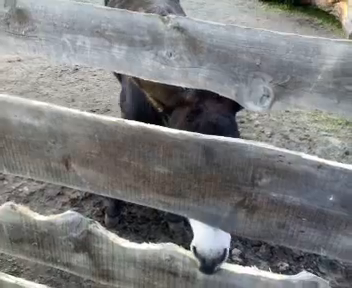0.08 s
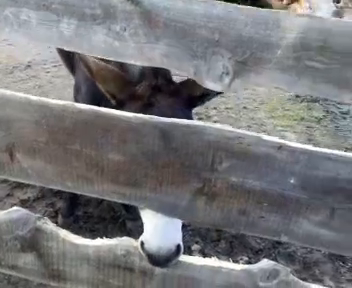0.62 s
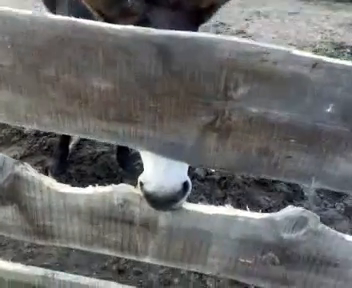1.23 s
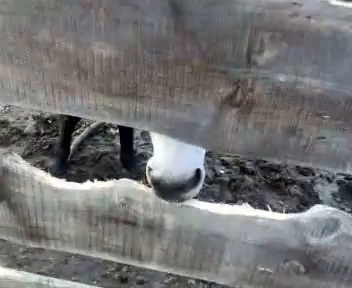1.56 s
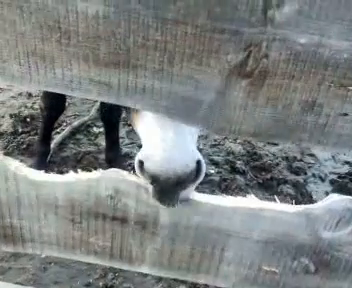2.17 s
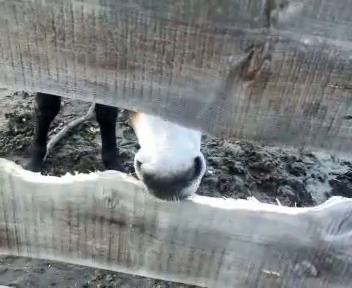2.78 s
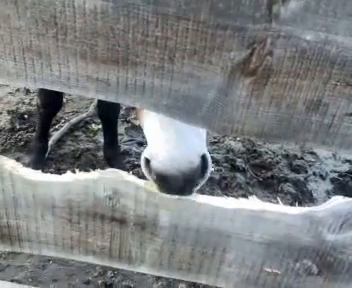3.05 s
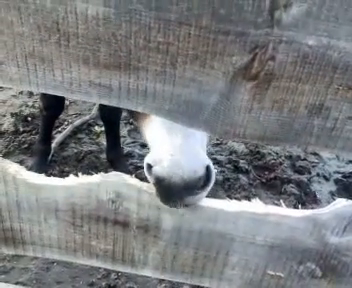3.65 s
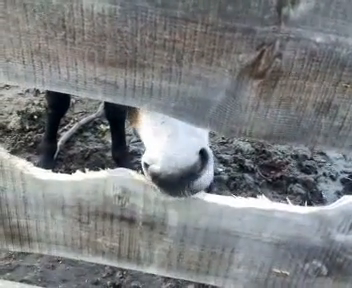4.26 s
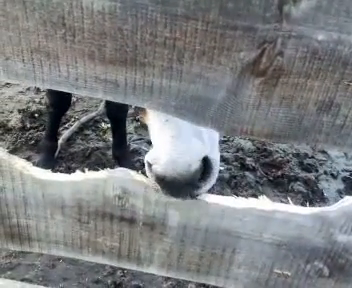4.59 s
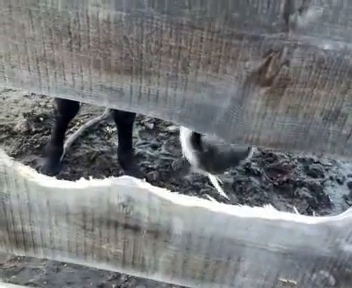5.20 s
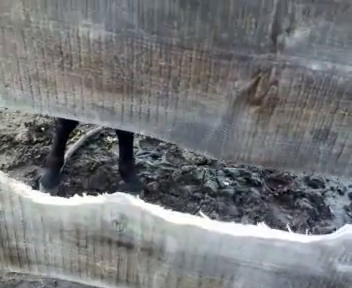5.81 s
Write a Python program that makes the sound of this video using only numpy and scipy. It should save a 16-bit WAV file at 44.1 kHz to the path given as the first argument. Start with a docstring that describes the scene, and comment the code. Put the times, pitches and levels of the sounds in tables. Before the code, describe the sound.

Wood snaps and crunches in short bursts as a donkey bites a fence, with a low hum in the distance.

```python
"""Outdoors at a wooden fence, about a metre away, a donkey gnaws the top edge of a rail.
Friction of muzzle and teeth makes rubs, crackle and stick-slip rasps; splinters snap in clusters
by brittle fracture. When the teeth slip off, the rail springs back and thuds in damped vibration.
A distant motor hums steadily under a faint hiss of open air, and a few thin, far tones come and go."""
import sys
import numpy as np
from scipy import signal
from scipy.fft import rfft, irfft
from scipy.io import wavfile
from scipy.ndimage import uniform_filter1d

SR = 44100
rng = np.random.default_rng(int(sys.argv[2]) if len(sys.argv) > 2 else 0)


def to_wav(sig):
    """Store sig (one row per channel, or 1-D mono) as 16-bit WAV at the path in sys.argv[1].

    Samples outside -1..1 are clipped; the rate is SR.
    """
    pcm = np.clip(np.atleast_2d(sig), -1, 1) * 32767
    pcm = np.round(pcm).astype(np.int16)
    wavfile.write(sys.argv[1], SR, pcm.T)  # frames by channels


N = 257367
TIME = np.arange(N) / SR

# Partials of the motor. Each row: frequency in Hz, rms level in dB.
MOTOR_PARTIALS = [(53.2, -50), (66.5, -52), (132.7, -48), (154.8, -58), (177.0, -73), (199.2, -66.5)]
# Spectra of the air and of the worked wood. Each row: frequency in Hz, relative density in dB.
AIR_SPECTRUM = [(15, -0.5), (45, -4.5), (100, -0.5), (200, -10), (300, -10.5), (500, -16), (1000, -16),
                (1700, -18), (2400, -22.5), (6800, -22), (9000, -27.5), (14000, -58)]
SNAP_SPECTRUM = [(150, -31), (600, -11.5), (1200, -7.5), (2000, -19.5), (2600, 0), (3300, 5.5), (4300, 1),
                 (5600, 1), (7200, 2), (9000, 4.5)]
SCRAPE_SPECTRUM = [(100, -12), (300, -4), (700, -6), (1100, -6), (1700, -6.5), (2400, -3.5), (3500, -1.5),
                   (5500, 0.1), (7000, 0), (9000, -2)]
THUD_SPECTRUM = [(40, -9.5), (90, 12.5), (200, 2.5), (350, 4), (700, 0), (1300, -3.5), (2400, -13),
                 (5000, -20)]
RASP_SPECTRUM = [(100, -11), (300, -4), (700, -10), (1200, -7), (1600, -2), (2400, -9.5), (3500, 4),
                 (5500, -0.5), (7000, 1), (9000, -0.5)]
# A brief, faint, high hiss as the sound opens, then rubs of the muzzle.
# Each row: midpoint in seconds, level in dB, centre in Hz, width in seconds.
NOISE_SWELLS = [(0.102, -56, 5500, 0.02), (0.36, -54.5, 3480, 0.038), (0.536, -55.5, 2400, 0.13),
                (0.995, -45, 380, 0.037), (1.091, -43.5, 5800, 0.061), (1.612, -33.5, 2080, .019),
                (1.818, -53.5, 1430, 0.018), (2.221, -54.5, 2200, 0.026), (2.46, -42.5, 3100, .016),
                (3.011, -52, 2750, 0.022), (3.322, -56, 4300, 0.18), (3.527, -42, 3650, 0.044),
                (3.78, -56, 260, 0.064), (4.099, -58, 1820, 0.15), (4.587, -40, 1500, 0.043),
                (5.7, -52, 1570, 0.0076)]
# Resonances of the chewed edge. Each row: frequency in Hz, bandwidth in Hz, gain in dB.
EDGE_RESONANCES = [(1640, 39, -1.5), (2326, 90, -5), (3020, 37, -11), (3280, 47, -10.5), (4206, 180, 0),
                   (4920, 130, -5.5), (5350, 34, -2), (6130, 60, -3), (6780, 75, 2.5), (7140, 360, -5.5)]
# Bending modes of the rail. Each row: frequency in Hz, level in dB, T60 in seconds.
RAIL_MODES = [(151, -10, 0.14), (197, -18.5, 0.078), (280, -14, 0.03), (320, 2.5, .11), (347.3, -1.5, 0.15),
              (452, -4, 0.3), (540.6, -5, 0.12), (557, 2, 0.089), (632, -1, 0.14), (715, -17.5, 0.04),
              (771, -3, 0.11), (835, -2, 0.073), (876, 4, 0.1), (1005, 8.5, 0.05), (1100, -8.5, 0.032),
              (1255, 5, 0.15)]
# Splinters snapping, plus one sharp crack at 1.037 s that gives the rail's knock at 1.039 s its edge. # Each
# row: time in seconds, level in dB, relative levels of the rail's body # and of the dull crunch in dB, T60 in
# seconds.
SPLINTER_SNAPS = [(0.4889, -34, -16, -9.5, .033), (1.037, -45, 6, 6.5, 0.022),
                  (1.12, -1, -25.5, -12, 0.013), (1.2103, -26, -21, -12, 0.024),
                  (1.3455, -18.5, -9, -11.5, 0.17), (1.3711, -27, -12, -13, .03),
                  (1.436, -26, -16, -12.5, 0.022), (1.4897, -27.5, -32, -13.5, 0.028),
                  (1.6004, -9, -13.5, -17, 0.034), (1.6075, -16.5, -5.5, -18, 0.082),
                  (1.7177, -32, -5, -13, .03), (2.5646, -31.5, -25, -15, .035),
                  (2.6366, -11.5, -13, -15, 0.03), (2.6478, -11, -14.5, -14.5, 0.038),
                  (2.729, -22, -28, -18.5, .043), (2.7828, -16, -19.5, -19.5, 0.03),
                  (2.8504, -24, 1, -29, 0.14), (2.8584, -17.5, -13.5, -11.5, 0.075),
                  (2.939, -23.5, -32, -26, 0.015), (3.9998, -24.5, -14.5, -16, 0.071),
                  (4.2695, -25.5, -30, -19, 0.1), (4.341, -6.5, -22.5, -19.5, 0.043),
                  (4.3587, -14.5, -21, -13, 0.049), (4.4909, -21.5, -23, -15, 0.12),
                  (4.541, -20.5, -9, -14.5, 0.21), (4.5774, -16, -11.5, -18.5, 0.022),
                  (4.796, -19, -19.5, -13, 0.017), (4.9578, -22.5, -12, -20, 0.033),
                  (4.9881, -13.5, -15, -13.5, 0.025), (5.0611, -2.5, -32, -23, 0.026),
                  (5.2057, -13.5, -18, -11, 0.053)]
# Teeth bearing on the wood. Each row: grip and let-go in seconds, scraping level in dB,
# attack and release in seconds.
TOOTH_GRIPS = [(0.503, 0.56, -52.5, 0.32, 0.2), (1.28, 1.598, -43.5, 0.67, 0.82),
               (2.596, 2.873, -42, 0.35, 0.48), (4.03, 4.608, -44.5, 0.053, 0.12),
               (4.935, 5.197, -44, 0.27, 0.045)]
# Jolts of the rail. Each row: time in seconds, level in dB, pitch in Hz, T60 of the judder in seconds,
# relative level of the preceding heave in dB.
RAIL_JOLTS = [(1.039, -31, 830, 0.037, -25), (1.123, -32, 405, 0.053, -13), (1.626, -15, 686, 0.029, -10),
              (2.645, -25, 685, .07, 0.5), (2.858, -22, 633, 0.089, -5), (4.581, -31, 328, 0.12, -10),
              (5.063, -34, 380, .07, -26), (5.208, -30, 704, 0.15, -24)]
# Runs of teeth skipping along the edge. Each row: start in seconds, length in seconds, level in dB.
SKIP_RUNS = [(1.333, .042, -29), (1.551, .004, -23), (1.567, .026, -21.5), (2.605, .028, -29),
             (2.678, .026, -24.5), (2.821, .028, -24), (4.013, .02, -26.5), (4.062, .018, -28.5),
             (4.097, .065, -31), (4.327, .016, -31), (4.449, .024, -28.5), (4.547, .068, -30),
             (5.016, .012, -23.5), (5.046, .013, -22), (5.219, .016, -28)]
# Faint far tones. Each row: start in seconds, length in seconds, level in dB, slope in dB per second,
# pitch in Hz, glide in Hz per second, hoarseness from 0 to 1.
FAR_TONES = [(3.059, 0.17, -62, 0, 1420, 1998.5, .95), (3.549, 1, -61.5, -7, 1678, -100, 0.9),
             (5.214, .35, -55, -15, 604, 67, 0.14), (5.42, 0.36, -62.5, -28, 3100, 60, 0.52)]
# The treble falls away above 7.5 kHz, with a notch at 8 kHz and a faint band above it.
# Each row: frequency in Hz, gain in dB.
TREBLE_ROLLOFF = [(20, 0), (7200, 0), (7600, -8), (7850, -24), (8030, -48), (8350, -21), (8750, -23),
                  (9200, -42)]


def undb(db):
    """Amplitude grows tenfold with every 20 dB."""
    return 10 ** (np.asarray(db) / 20)


def unit(x):
    """Normalisation to an rms of 1."""
    return x / np.sqrt(np.mean(x ** 2))


def unit_peak(x, size=100):
    """Normalisation of the loudest couple of milliseconds to an rms of 1."""
    return x / np.sqrt(uniform_filter1d(x ** 2, size).max())


def decay(t, t60):
    """Damping gives an exponential decay, 60 dB down after t60 seconds."""
    return np.exp(-np.log(1000) * t / t60)


def add(out, start, x):
    """Superposition: x sums into out from start seconds on."""
    i = max(int(start * SR), 0)
    out[i:i + len(x)] += x[:N - i]


def colour(x, points, size=4096):
    """Minimum-phase filtering through (Hz, dB) points: folding the cepstrum makes it causal."""
    hz, db = np.transpose(points)
    grid = np.maximum(np.arange(size // 2 + 1) * SR / size, 1)
    gain = undb(np.interp(np.log(grid), np.log(hz), db))
    cepstrum = irfft(np.log(gain))
    cepstrum[1:size // 2] *= 2
    cepstrum[size // 2 + 1:] = 0
    return signal.fftconvolve(x, irfft(np.exp(rfft(cepstrum))))[:len(x)]


def resonate(x, hz, width):
    """A damped resonator passes a band, with a gain of 1 at its centre."""
    return signal.lfilter(*signal.iirpeak(hz, hz / min(width, SR / 4), fs=SR), x)


def drift(rate):
    """Random modulation: rate steps a second, smoothed twice, with a spread near 1."""
    hold = int(SR / rate)
    steps = np.repeat(rng.standard_normal(N // hold + 1), hold)
    return np.sqrt(2) * uniform_filter1d(uniform_filter1d(steps, hold), hold)[:N]


def motor(waver=0.0021, flutter_db=-0.34):
    """Periodic motion gives a line spectrum: a distant motor, wavering in speed and strength."""
    clock = np.cumsum(1 + waver * drift(rate=2.86)) / SR
    out = np.zeros(N)
    for hz, db in MOTOR_PARTIALS:
        amplitude = np.sqrt(2) * undb(db + flutter_db * drift(rate=4.3))
        out += amplitude * np.sin(2 * np.pi * (hz * clock + rng.random()))
    return out


def air(level_db=-52.5, swell_db=1.42):
    """Open air has a continuous noise spectrum: rumble and hiss, gently swelling."""
    noise = unit(colour(rng.standard_normal(N), AIR_SPECTRUM))
    return noise * undb(level_db + swell_db * drift(rate=3.058))


def hiss_and_rubs(width_share=1.47, grain_db=5.5):
    """Grainy swells of band noise: a brief opening hiss, then sliding friction of muzzle on wood."""
    out, t = np.zeros(N), TIME[:SR // 2] - TIME[SR // 4]
    for middle, db, hz, duration in NOISE_SWELLS:
        noise, width = rng.standard_normal(len(t)), width_share * hz
        band = unit(resonate(resonate(noise, hz, width), hz, width))
        add(out, middle + t[0], undb(db) * band * np.exp(-2 * (t / duration) ** 2))
    return out * undb(grain_db * np.tanh(drift(rate=150)))


def fibres(count, rate, spread_db):
    """Fibres break as a Poisson process: rate impulses a second, their sizes set apart by spread_db."""
    hit = rng.random(count) < rate / SR
    sign = rng.choice([-1, 1], count)
    return hit * sign * undb(spread_db * np.minimum(rng.exponential(size=count), np.pi))


def edge(x, direct=0.93):
    """Short resonances of the chewed edge colour the breaks that excite them."""
    return direct * x + sum(undb(db) * resonate(x, hz, width) for hz, width, db in EDGE_RESONANCES)


def rail(push, detune=0.02, contact_db=0.5):
    """The rail rings as a sum of bending modes; the jaw's grip detunes and weights them at each push."""
    t, chance = TIME[:len(push)], rng.standard_normal((len(RAIL_MODES), 2))
    ring = np.zeros(len(t))
    for k, (hz, db, t60) in enumerate(RAIL_MODES):
        amplitude = (-1) ** k * undb(db + contact_db * chance[k, 0])
        mode_hz = hz * (1 + detune * chance[k, 1])
        ring += amplitude * np.sin(2 * np.pi * mode_hz * t) * decay(t, t60)
    return signal.fftconvolve(push, ring)[:len(push)]


def snaps(splinter_hz=3980, splinter_spread=0.19, strain_db=-16, hold_s=0.0037,
          snap_db=-1, crunch_hz=2050, crunch_width_hz=1800, thump_db=-5, ring_db=-9):
    """Brittle fracture releases stored strain: fibres part, a splinter gives way, the rail recoils."""
    out, lead = np.zeros(N), SR // 50
    t = TIME[:SR // 6] - TIME[lead]
    for time, db, body_db, crunch_db, t60 in SPLINTER_SNAPS:
        strain = undb(strain_db) * decay(abs(t), t60=0.042)
        release = decay(np.maximum(t - hold_s, 0), t60)
        breaks = unit(fibres(len(t), rate=12000, spread_db=3)) * np.where(t < 0, strain, release)
        breaks[lead] += 0.96 * np.pi  # the splinter gives way
        crack = edge(colour(breaks, SNAP_SPECTRUM))
        hz = splinter_hz * np.exp(splinter_spread * rng.standard_normal())
        snap = unit_peak(crack + 0.61 * resonate(crack, hz, width=1200))
        # Thicker bundles of fibres give way with a duller crunch.
        band = resonate(breaks, crunch_hz, crunch_width_hz)
        crunch = undb(crunch_db) * unit_peak(edge(resonate(band, crunch_hz, crunch_width_hz)))
        thump = undb(thump_db) * unit_peak(colour(breaks, THUD_SPECTRUM))
        ring = undb(ring_db) * unit_peak(rail(breaks * decay(abs(t), t60=0.014)))
        fracture = undb(snap_db) * (snap + crunch) + undb(body_db) * (thump + ring)
        add(out, time + t[0], undb(db) * fracture)
    return out


def bite_envelope(range_db=23, nuzzle_db=-62):
    """Incoherent sources add in power: bites that build, hold and let go, and the nuzzling lips."""
    nuzzling = (TIME > TOOTH_GRIPS[0][0]) & (TIME < TOOTH_GRIPS[-1][1])
    power = undb(nuzzle_db) ** 2 * nuzzling
    for grip, let_go, db, attack, release in TOOTH_GRIPS:
        slack = np.maximum(grip - TIME, 0) / attack + np.maximum(TIME - let_go, 0) / release
        power = power + undb(db - range_db * slack) ** 2
    return np.sqrt(power)


def scrape(gain_db=-0.5, flicker_db=1, tick_db=3):
    """Friction of teeth and lips over the grain crackles; now and then a fibre catches and ticks."""
    breaks = fibres(N, rate=5000, spread_db=3)
    crackle = unit(edge(colour(breaks, SCRAPE_SPECTRUM), direct=1.3))
    catches = abs(fibres(N, rate=22, spread_db=3.5))
    ticks = signal.fftconvolve(catches, decay(TIME[:SR // 10], t60=0.086))[:N]
    flicker = undb(gain_db + flicker_db * drift(rate=90))
    return crackle * bite_envelope() * flicker * np.hypot(1, undb(tick_db) * ticks)


def jolts(heave_lead_s=0.011, heave_ratio=0.478, heave_t60=0.23,
          bounce_s=0.019, bounce_db=-11, bounce_ratio=0.864, bounce_t60=0.14):
    """Elastic recoil: the rail bends with a low heave, knocks, and rebounds twice, weaker and lower."""
    for time, db, hz, t60, heave_db in RAIL_JOLTS:
        yield time - heave_lead_s, db + heave_db, hz * heave_ratio, heave_t60
        yield time, db, hz, t60
        for k in (1, 2):
            yield time + k * bounce_s, db + k * bounce_db, hz * bounce_ratio ** k, bounce_t60


def thuds(width_share=0.33, judder_db=-3, ring_db=-13):
    """Damped free vibration: the teeth slip, and the rail swings and judders against its posts."""
    out, t = np.zeros(N), TIME[:SR // 4]
    for start, db, hz, t60 in jolts():
        onset = np.minimum(hz * t, 1)  # the heavy rail needs one swing to get going
        swing = np.sin(2 * np.pi * hz * t) * np.exp(-np.pi * width_share * hz * t) * onset
        impacts = fibres(len(t), rate=4000, spread_db=0) * decay(t, t60)
        rattle = colour(impacts, THUD_SPECTRUM)
        judder = undb(judder_db) * unit_peak(rattle + resonate(rattle, hz, hz / 2))
        ring = undb(ring_db) * unit_peak(rail(swing))
        add(out, start, undb(db) * unit_peak(unit_peak(swing) + judder + ring))
    return out


def rasps(skip_hz=85, jitter=0.35, scatter_db=1.1, gain_db=0.36, max_slips=16):
    """Stick-slip friction: the teeth skip at an uneven pace, and each slip tears a bunch of fibres."""
    force, slip = np.zeros(N), decay(TIME[:SR // 8], t60=0.05)
    for start, length, db in SKIP_RUNS:
        pace, size = rng.standard_normal((max_slips, 2)).T
        lags = np.cumsum(np.exp(jitter * pace)) / skip_hz
        for lag, slip_db in zip(lags - lags[0], db + scatter_db * size):
            if lag < length:
                add(force, start + lag, undb(slip_db) * slip)
    breaks = fibres(N, rate=11000, spread_db=-1)
    tearing = unit(edge(colour(breaks, RASP_SPECTRUM)))
    return undb(gain_db) * force * tearing


def far_tones(waver=0.0035, flutter_hz=190, attack_s=0.013, release_s=0.07):
    """Fast amplitude modulation spreads faint gliding tones into sidebands, making some hoarse."""
    out, wobble, flutter = np.zeros(N), drift(rate=28), drift(rate=flutter_hz)
    for start, length, db, slope, hz, glide, hoarse in FAR_TONES:
        t = TIME[:int(length * SR)]
        cycles = np.cumsum((hz + glide * t) * (1 + waver * wobble[:len(t)])) / SR
        gate = np.minimum(np.minimum(t / attack_s, (length - t) / release_s), 1)
        roughness = np.sqrt(1 - hoarse ** 2) + hoarse * flutter[:len(t)]
        amplitude = np.sqrt(2) * gate * undb(db + slope * t) * roughness
        add(out, start, amplitude * np.sin(2 * np.pi * cycles))
    return out


def yard(x, t60=0.077, delay_s=0.005, send_db=-18):
    """Scattering from planks and ground adds a short reverberant tail."""
    t = TIME[:SR // 2]
    tail = rng.standard_normal(len(t)) * decay(t, t60) * (t > delay_s)
    tail /= np.sqrt(np.sum(tail ** 2))
    tail = colour(tail, [(100, 4.5), (600, 16), (2000, 6.5), (7000, -3.5)])
    return x + undb(send_db) * signal.fftconvolve(x, tail)[:N]


def scene():
    """Sound pressures add: the gnawing and its reflections lie over the distant background."""
    background = motor() + air() + far_tones()
    foreground = yard(snaps() + rasps() + thuds() + scrape() + hiss_and_rubs())
    return (foreground + background)[None]


def record(dry, start_s=0.078, rise_s=0.01, ceiling=0.8, cutoff_hz=9200):
    """After a fade-in, saturation rounds the peaks, and the treble falls away above 7.5 kHz."""
    opened = dry[0] * np.clip((TIME - start_s) / rise_s, 0, 1)
    rounded = ceiling * np.tanh(opened / ceiling)
    lowpass = signal.ellip(8, 0.2, 70, cutoff_hz, fs=SR, output="sos")
    return signal.sosfilt(lowpass, colour(rounded, TREBLE_ROLLOFF))[None]


dry = scene()
out = record(dry)
to_wav(out)
```